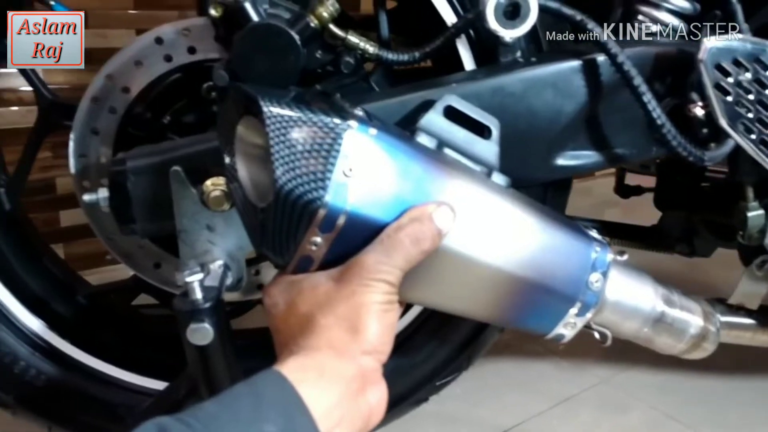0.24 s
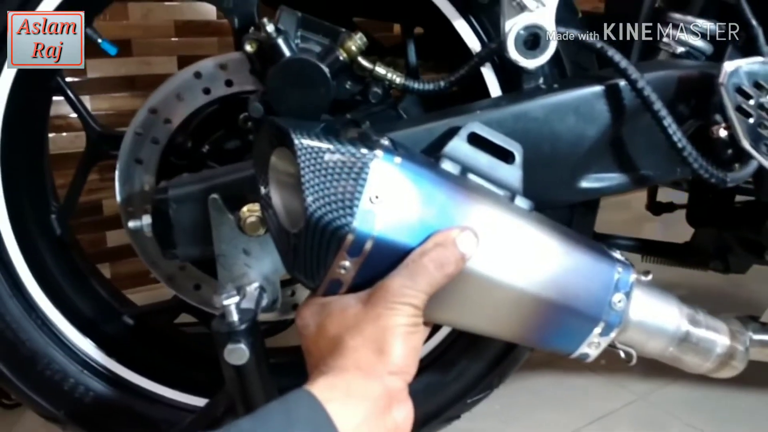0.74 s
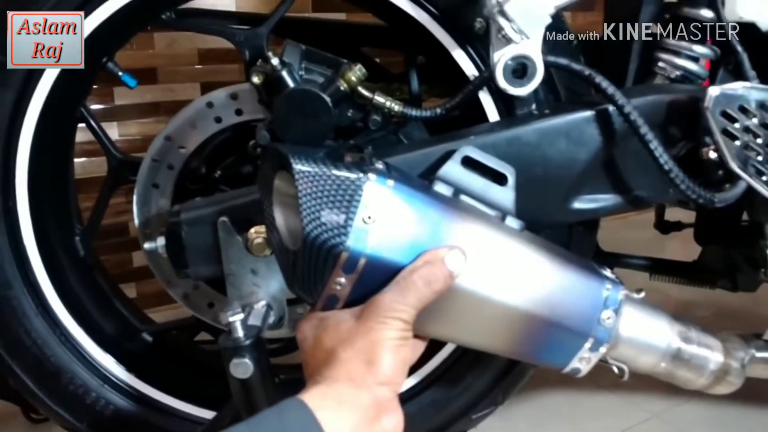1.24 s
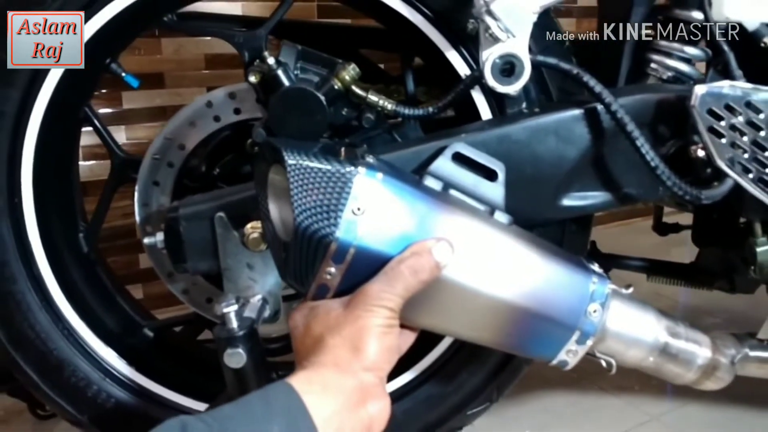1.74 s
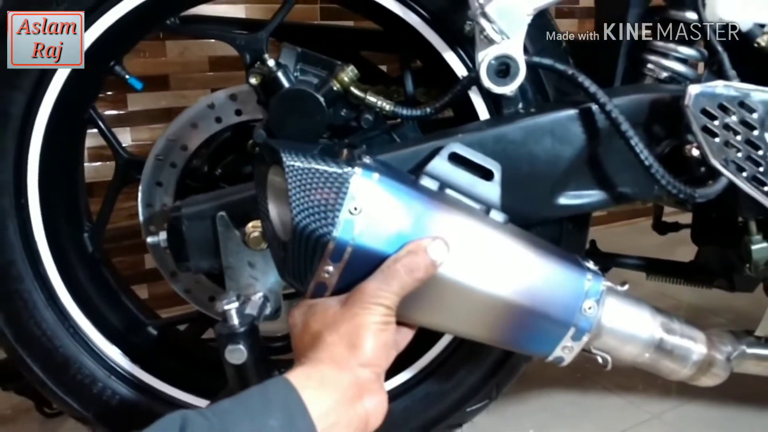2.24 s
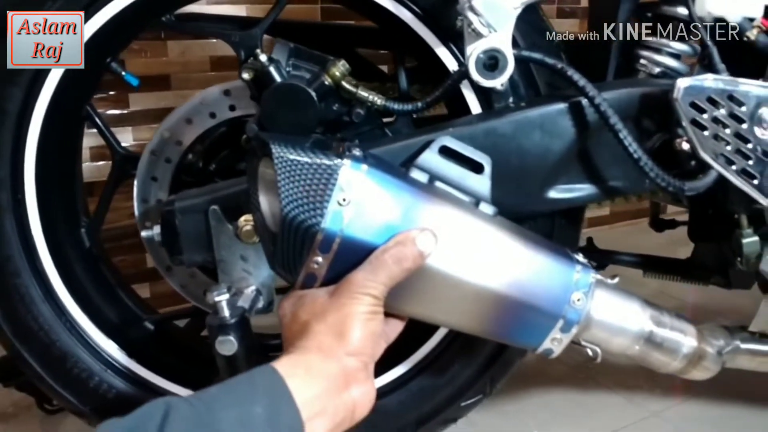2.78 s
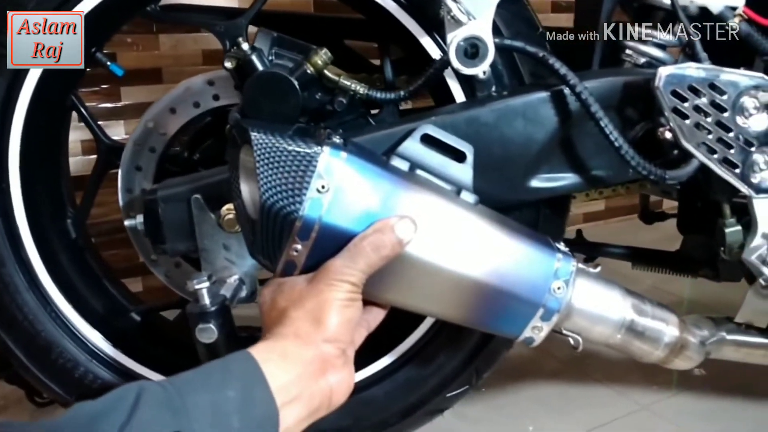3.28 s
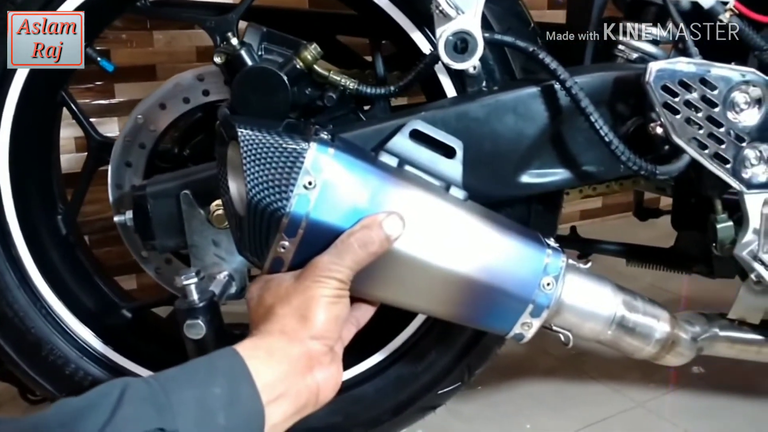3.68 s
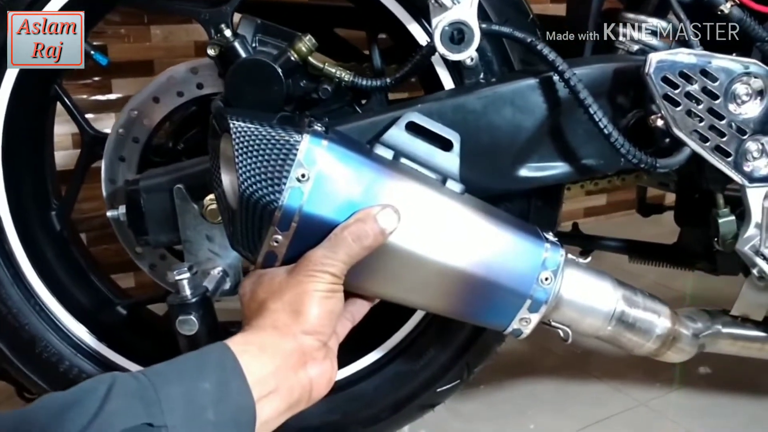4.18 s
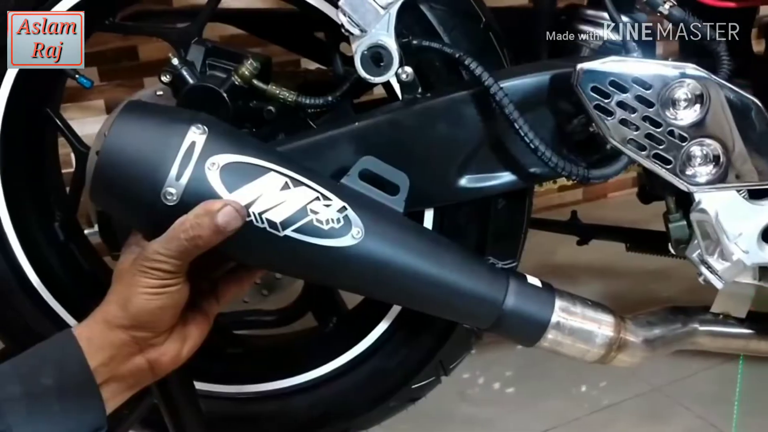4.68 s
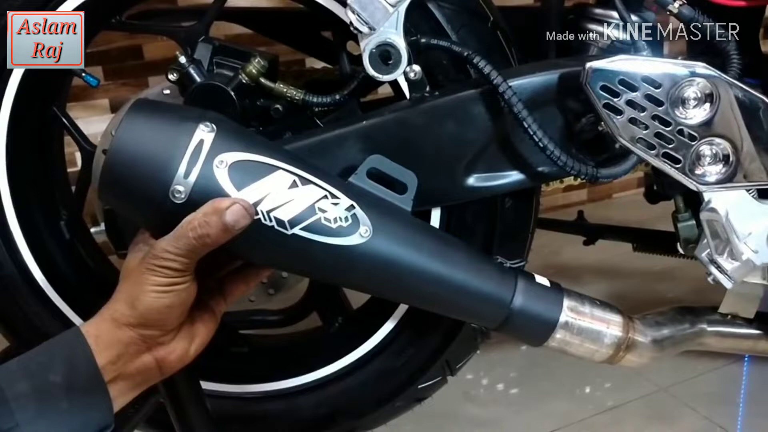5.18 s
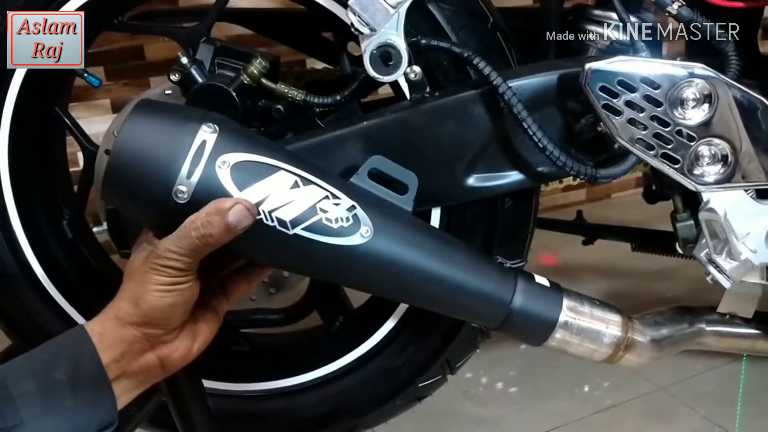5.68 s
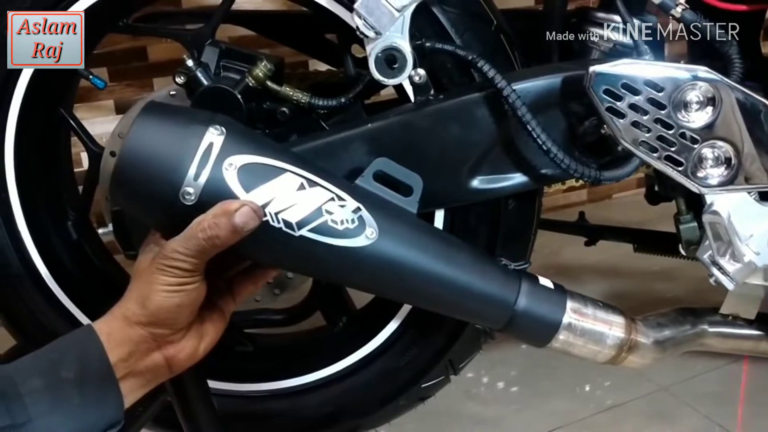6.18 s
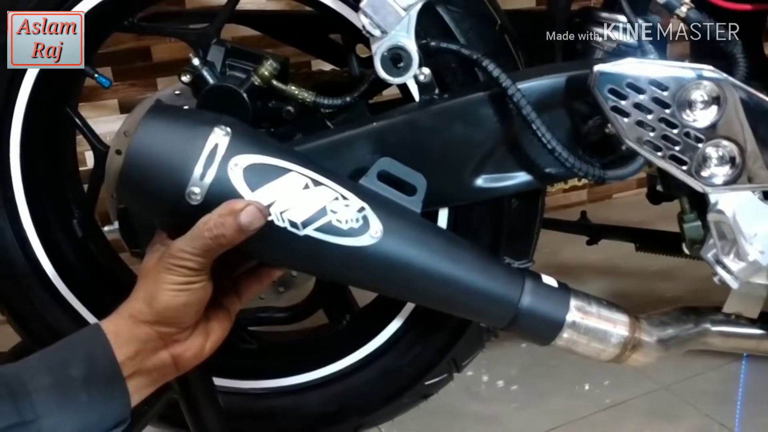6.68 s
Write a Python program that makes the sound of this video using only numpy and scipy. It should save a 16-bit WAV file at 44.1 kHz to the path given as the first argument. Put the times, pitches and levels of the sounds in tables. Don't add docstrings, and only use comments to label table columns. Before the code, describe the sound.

A single-cylinder motorcycle is heard close to its exhaust in a hard tiled shop, in wide stereo with short reflections. At 0 s it is already at high speed with a blast of gas, dips, then roars raspy and metallic from 0.3 to 0.8 s. It slows to a lumpy, thudding idle by about 1.6 s. Around 1.85 s pops lead into a second hard rev, peaking at 2.3 to 2.6 s, overloaded, with violent backfire cracks between 2.4 and 2.6 s. It winds down to uneven putters with small pops until 3.9 s, then cuts off. Faint rumble, one tiny dry knock near 4 s and a soft hiss from 4.2 s fill the gap, then near silence. At 4.5 s a rounder, milder idle fades in quickly, with short blips at 4.7, 5.3, 5.75 and 6.55 s, each dropping back, still running at the end near 6.9 s.

```python
import sys
import numpy as np
from scipy import signal
from scipy.fft import rfft, irfft, next_fast_len
from scipy.io import wavfile
from scipy.ndimage import uniform_filter1d, map_coordinates

SR = 44100
rng = np.random.default_rng(int(sys.argv[2]) if len(sys.argv) > 2 else 0)


def voltage_ratio(level):
    return 10 ** (np.asarray(level, float) / 20)


def file_out(sig):
    cols = np.atleast_2d(sig).T
    lim = np.clip(cols, -1, 1)
    pcm = np.round(lim * 32767).astype(np.int16)
    wavfile.write(sys.argv[1], SR, pcm)


N = 305613

# (start [s], end [s])
PARTS = [
    (0, 3.91),
    (3.906, 4.364),
    (4.5, 6.93),
]
# (time [s], rate [1/s])
REV_RATE = [(0, 109), (.26, 79), (.45, 113.5), (.55, 106.6), (.85, 95.6), (1.1, 68), (1.4, 39), (1.55, 32),
            (1.83, 28.7), (2.02, 56.5), (2.25, 101.6), (2.36, 117.4), (2.6, 119.7), (2.8, 93.5), (2.97, 69),
            (3.25, 41.7), (3.55, 29.9), (3.92, 25.7)]
# (time [s], level over idle [dB])
REV_FLOW = [(0, 34), (.13, 14), (.26, 12.5), (.34, 33.5), (.4, 24), (.79, 22), (.89, 14), (1.43, 0.5),
            (1.83, 1.5), (1.86, 6), (2.14, 20.5), (2.22, 31), (2.35, 23.5), (2.76, 21), (2.99, 10.5),
            (3.33, -2), (3.55, 1), (3.9, 4)]
# (start [s], end [s])
REV_OPEN = [
    (-.1, .09),
    (.28, .82),
    (1.85, 2.64),
]
# (throttle opens [s], shuts [s], top firing rate [1/s], flow over idle [dB])
BLIPS = [
    (4.72, 4.93, 56.8, 9),
    (5.33, 5.47, 57, 12.5),
    (5.749, 5.93, 69, 12),
    (6.54, 6.671, 47.7, 9),
]
# (centre [s], half length [s], unrest [1], weakness of every other firing [dB])
STUMBLES = [
    (0, .08, .7, 1),
    (.5, .1, .5, 3),
    (.71, .13, -.3, 1.5),
    (.88, .08, .7, 1),
    (2.56, .14, .7, 11),
]
# (time [s], peak level [dB], t60 [s])
POPS = [(0.8358, -7, 0.016), (1.1598, -30, 0.015), (1.3658, -41, 0.015), (1.68, -25, 0.0086),
        (1.8506, -14.5, 0.022), (1.8832, -12, 0.016), (1.931, -12, 0.0071), (2.402, 1, 0.018),
        (2.4754, 2, 0.055), (2.5117, -8.5, 0.015), (2.555, 10.5, 0.019), (2.603, -2, 0.02),
        (2.9544, -30, 0.015), (3.388, -29, 0.017), (3.7445, -20.5, 0.018), (3.782, -22, 0.023),
        (3.8595, -18, 0.015), (4.723, -19.5, 0.015), (5.02, -30, 0.016), (5.4353, -16, 0.027),
        (5.7604, -19, 0.025), (5.784, -22, 0.012), (6.1024, -23, 0.015), (6.5608, -19, 0.032)]
# (part of cycle [1], level [dB])
VALVE = [(0, -20), (.03, -2), (.2, 0), (.48, -2), (.64, -11), (1, -17)]
# (frequency [Hz], width [Hz], level [dB])
BOOM = [(172.7, 35, 5.5), (251.8, 67, -3.5)]
GROWL = [(357.3, 17.5, 0)]
CAN_1 = [(501, 110, 3), (718, 130, 3), (1032.3, 35.5, 0), (1510, 590, -15.5), (1706, 51, 3)]
CAN_2 = [(526, 330, 6.5), (784, 100, 8), (1020, 83, -4.5), (1610, 930, -4)]
THUD = [(65.6, 29, -9)]
# (multiple [1], frequency [Hz], width [Hz], swell [dB])
MEETS = [(2, 186, 26, 3), (3, 343, 23, 14), (5, 502, 34, 5)]
SWELL_DIP = [3.1, 1.2, .3]
# (multiple [1], level over bark [dB])
SONG = [(5, 2), (10, -6), (12, -13), (13, -12), (15, -15), (17, -12), (20, -15)]
# (idle level [dB], per flow [dB/dB], per speed [dB/dB])
LEVELS_1 = [(-23, .1, 1.05), (-34.5, .6, .1), (-36.5, .4, 1.95), (-39.5, 1.0317, 0.0449)]
LEVELS_2 = [(-23, .7, 0.64), (-33, 1.05, 1.3), (-39, .8, 2.05), (-40.5, 0.99, .01)]
# (frequency [Hz], density [dB per Hz])
JET = [(300, -2.5), (800, -1.5), (1700, -5.5), (2600, -9), (3700, -10), (5000, -16), (8000, -31.5),
       (15500, -43.5)]
FIZZ = [(2500, -37.5), (5000, -27), (7000, 13.5), (10000, 3.5), (13000, -1.5), (15500, -16)]
RUMBLE = [(30, -1), (60, -12.5), (160, 1.5), (300, -11.5), (800, -17.5), (2000, -24), (6000, -40.5)]
HISS = [(300, -2.5), (900, -4), (1300, -2.5), (3200, -3.5), (6000, -9), (15000, -28)]
# (time [s], peak level [dB], frequency [Hz], t60 [s])
KNOCK = (3.9872, -5, 760, .004)
# (frequency [Hz], t60 [s])
SHOP = [(100, 0.7), (1000, 0.19), (4000, 0.11), (12000, 0.031)]
# (frequency [Hz], from level [1], from arrival time [1], from scatter [1])
PORTS = [(50, .03, .05, .05), (130, .03, .12, .015), (200, .06, .17, .02), (390, .1, .21, .05),
         (600, .05, 0, .17), (1000, -.1, 0, .35), (2000, -.6, -.1, .5), (4200, -.5, -.2, .7),
         (7000, -.3, .2, .95), (15000, -.2, .1, 1.05)]

IDLE_RATE, IDLE_FLOW_DB = 30, 0
TIME = np.arange(N) / SR


def unit(x):
    return x / np.sqrt(np.mean(x ** 2) + 1e-20)


def steady(x):
    power = uniform_filter1d(uniform_filter1d(x * x, size=4000), size=4000)
    return x / np.sqrt(np.abs(power) + 1e-12)


def along(points, hz, axis=1):
    cols = np.transpose(points)
    return np.interp(np.log(hz + 1), np.log(cols[0] + 1), cols[axis])


def curve(rows):
    return np.interp(TIME, *np.transpose(rows))


def filtered(x, response):
    m = next_fast_len(N + SR // 2)
    return irfft(rfft(x, m) * response(np.fft.rfftfreq(m, 1 / SR)), m)[..., :N]


def modes(rows):
    def response(f):
        total = 0
        for k, (centre, width, db) in enumerate(rows):
            resonator = 1j * f * width / (centre ** 2 - f ** 2 + 1j * f * width)
            total = total + (-1) ** k * voltage_ratio(db) * resonator
        return total
    return response


def noise(spectrum):
    return unit(filtered(rng.standard_normal(N), lambda hz: voltage_ratio(along(spectrum, hz))))


def dying(x, t60):
    return signal.lfilter([1], [1, -voltage_ratio(-60 / (t60 * SR))], x)


def during(part, fade=0.0023):
    since_start = TIME - part[0] + (part[0] == 0)
    until_end = part[1] - TIME + (part[1] > 6.9)
    return np.clip(np.minimum(since_start, until_end) / fade, 0, 1)


def engine():
    rate, flow_db, first = throttle()
    scatter_db, skip_db, share = burn(rate)
    turns = crank(rate)
    cycle = turns.astype(int)
    since = TIME - np.interp(cycle, turns, TIME)
    luck = rng.standard_normal((cycle[-1] + 1, 4))[cycle]
    strength = voltage_ratio(scatter_db * luck[:, 0] - skip_db * (cycle % 2))
    valve = strength * voltage_ratio(np.interp(turns - cycle, *np.transpose(VALVE)))
    blows = strength * np.diff(cycle, prepend=cycle[0])
    boom_db, growl_db, bark_db, jet_db, singing = levels(rate, flow_db, first)

    def blend(clean, body, rough):
        stirred = filtered(valve * rng.standard_normal(N), modes(body))
        return np.sqrt(1 - rough * share) * steady(clean) + np.sqrt(rough * share) * steady(stirred)

    def pipe(body):
        struck = np.zeros(N)
        for k, (hz, _, db) in enumerate(body):
            struck += voltage_ratio(db + scatter_db * luck[:, k + 2]) * np.sin(2 * np.pi * hz * since)
        return filtered(-valve * struck, lambda f: 1 / (1 + (125 / (f + 1)) ** 5))

    boom = voltage_ratio(boom_db + .1) * blend(pipe(BOOM), BOOM, rough=.6)
    growl_ring = filtered(pipe(GROWL), modes([(340, 110, 0)]))
    growl = voltage_ratio(growl_db + .1) * blend(growl_ring, GROWL, rough=.8)
    bark = voltage_ratio(bark_db - 5.0) * np.where(first, *[can_ring(blows, can, blend) for can in (CAN_1, CAN_2)])
    thud = voltage_ratio(.25 * boom_db - 28.5) * steady(filtered(blows, modes(THUD)))
    purity = singing * np.clip(1 - 4 * share, 0, 1)
    return boom + growl + bark + song(turns, bark_db, purity) + thud + jet(blows, luck[:, 1], jet_db)


def can_ring(blows, can, blend):
    lag = round(.0056 * SR)
    knocks = .7 * blows + np.roll(blows, lag) + .6 * np.roll(blows, 2 * lag)
    return blend(filtered(knocks, modes(can)), can, rough=1.5)


def song(turns, bark_db, purity):
    tones = np.zeros(N)
    for multiple, db in SONG:
        tones += voltage_ratio(bark_db + db) * np.sin(2 * np.pi * round(multiple) * turns)
    return purity * tones


def jet(blows, luck, jet_db):
    gate = steady(dying(blows * voltage_ratio(4 * luck), t60=.04)) + 2.4
    cracks, t = np.zeros(N), np.arange(SR // 10) / SR
    for s, db, t60 in POPS:
        cracks[round(s * SR):][:len(t)] += voltage_ratio(db - 0.5 - 60 * t / max(t60, .003))
    rasp = voltage_ratio(jet_db + 3.5) * steady(gate * noise(JET))
    fizz = voltage_ratio(1.013 * jet_db - 17.0) * steady((gate + 1.5) * noise(FIZZ))
    return rasp + fizz + cracks * (noise(JET) + 0.07 * noise(FIZZ))


def throttle():
    sag_per_s, climb_bend = 82, .8
    open_s, ease_db_per_s, ease_lead_s = 0.046, 43, .05
    rate, flow_db = np.full(N, 1. * IDLE_RATE), np.full(N, 1. * IDLE_FLOW_DB)
    for opens, shuts, top, db in BLIPS:
        climb = np.clip((TIME - opens) / (shuts - opens), 0, 1) ** climb_bend
        start = rate[round(opens * SR)]
        sag = sag_per_s * np.clip(TIME - shuts, 0, None)
        later = np.maximum(IDLE_RATE, start + (top - start) * climb - sag)
        rate = np.where(TIME < opens, rate, later)
        rise = IDLE_FLOW_DB + (db - IDLE_FLOW_DB) * (TIME - opens) / open_s
        ease = db - ease_db_per_s * np.clip(TIME - shuts + ease_lead_s, 0, None)
        flow_db = np.maximum(flow_db, np.minimum(rise, ease))
    first = TIME < 4.2
    rate = np.where(first, curve(REV_RATE), uniform_filter1d(rate, size=2200))
    return rate, np.where(first, curve(REV_FLOW), flow_db), first


def burn(rate):
    hunt_rate, hunt_width = 36, 7
    coasting = np.clip(-np.gradient(uniform_filter1d(rate, size=4000)) * SR / 20, 0, 1)
    unrest = coasting * np.exp(-((rate - hunt_rate) / hunt_width) ** 2)
    skip_db = np.zeros(N)
    for s, half, much, db in STUMBLES:
        near = np.clip(2 - 2 * np.abs(TIME - s) / half, 0, 1)
        unrest, skip_db = unrest + much * near, skip_db + db * near
    return 1.1 + 3 * unrest, skip_db, .11 + .24 * unrest


def crank(rate):
    turns = np.cumsum(rate) / SR
    slow_rate = 46
    pops = [round(s * SR) for s, *_ in POPS]
    at = np.array([i for i in pops if rate[i] < slow_rate])
    return turns - np.interp(np.arange(N), at, np.unwrap(turns[at] % 1, period=1) - 1)


def levels(rate, flow_db, first):
    speed_db = np.minimum(20 * np.log10(rate / IDLE_RATE), 9.5)

    def law(rows):
        return np.array([db + a * flow_db + b * speed_db for db, a, b in rows])

    snap_s = .03
    opened = sum(np.clip(np.minimum(TIME - a, b - TIME) / snap_s + .5, 0, 1) for a, b in REV_OPEN)
    boom, growl, bark = [db / (1 + ((hz - round(k) * rate) / w) ** 4) for k, hz, w, db in MEETS]
    growl, bark = growl * opened, bark * opened
    lump_db, lump_rate = 2.5, 9
    knots = rng.standard_normal((2, 100))
    lumps = [lump_db * IDLE_RATE / rate * map_coordinates(k, [TIME * lump_rate]) for k in knots]
    boom_swell = boom - SWELL_DIP[0] * bark - SWELL_DIP[2] * growl + lumps[0]
    growl_swell = growl - SWELL_DIP[1] * bark + lumps[1]
    swells = [boom_swell, growl_swell, bark, np.zeros(N)]
    fade_db = -10.5 * np.clip(1 - (TIME - PARTS[2][0]) / 0.11, 0, 1)
    layers = np.where(first, law(LEVELS_1), law(LEVELS_2) + fade_db) + swells
    return *layers, (bark / MEETS[2][3]) ** 2


def tail():
    hz, t, z = signal.stft(rng.standard_normal(SR // 3), SR, nperseg=256)
    answer = signal.istft(z * voltage_ratio(-60 * t / along(SHOP, hz)[:, None]), SR, nperseg=256)[1]
    return answer / np.linalg.norm(answer)


def pause():
    hiss_db = -47.5 + 11 * np.clip((TIME - 4.18) / 0.077, 0, 1)
    s, db, hz, t60 = KNOCK
    t = np.clip(TIME - s, 0, None)
    knock = -voltage_ratio(db - 60 * t / t60) * np.sin(2 * np.pi * hz * t)
    return voltage_ratio(-36.5) * noise(RUMBLE) + voltage_ratio(hiss_db) * noise(HISS) + knock


def scene():
    x = engine() * (1 - during((3.904, 4.4))) + pause() * during(PARTS[1])
    wet, walls = signal.oaconvolve(x[None], np.array([tail(), tail()]), axes=1)[:, :N]
    both = x + voltage_ratio(-12) * filtered(wet, lambda f: 1j * f / (500 + 1j * f))
    lean = filtered(both, lambda f: along(PORTS, f, axis=1) + 1j * along(PORTS, f, axis=2))
    apart = lean + filtered(walls, lambda f: along(PORTS, f, axis=3))
    return np.array([both + apart, both - apart])


def low_pass(x):
    return signal.sosfilt(signal.butter(12, 15350, fs=SR, output="sos"), x)


def record(dry):
    cross_s = 0.0004015
    late = filtered(dry, lambda f: np.exp(-2j * np.pi * f * cross_s))
    x = filtered(dry - late[::-1], lambda f: (1 + 650 / (1j * f + 40)) * 0.6 / (1 + (48 / (f + 1)) ** 4))
    x = x / (1 + np.abs(x) ** 20) ** (1 / 20)
    drift = voltage_ratio(-52.0) * np.sin(2 * np.pi * 9 * TIME) * np.array([[1], [-.8]])
    floor = voltage_ratio(-54.5) * np.array([noise(RUMBLE), noise(RUMBLE)])
    on = during(PARTS[0]) + during(PARTS[1]) + during(PARTS[2], fade=0.028)
    return low_pass(x * on + (drift + floor) * (1 - on))


dry = scene()
out = record(dry)
file_out(out)
```